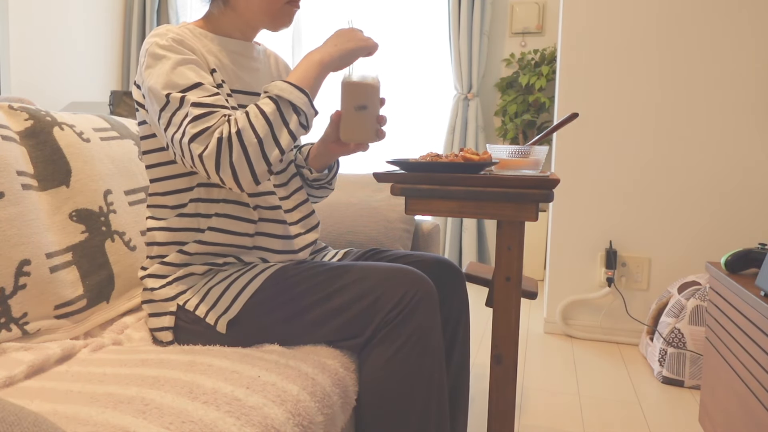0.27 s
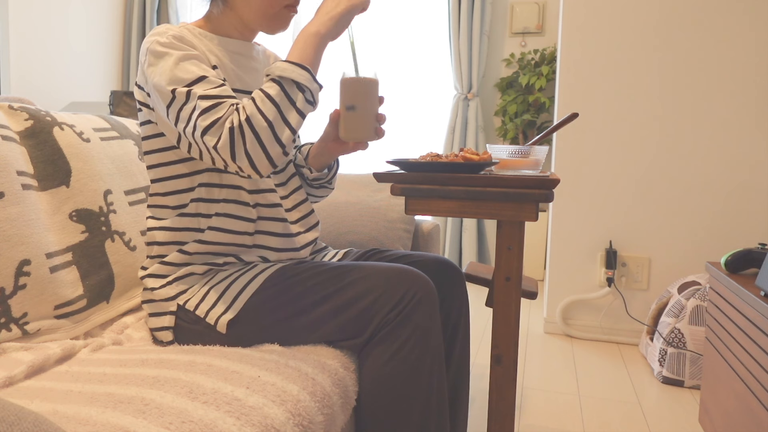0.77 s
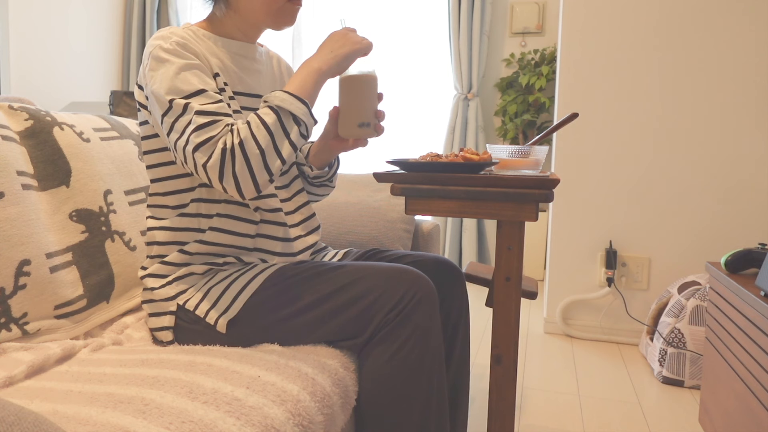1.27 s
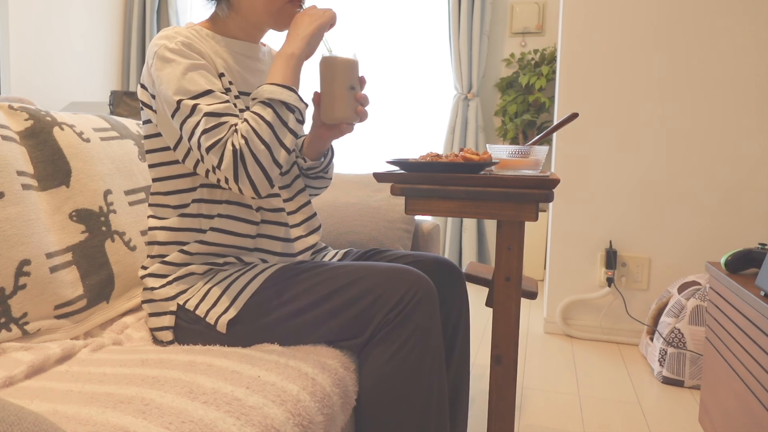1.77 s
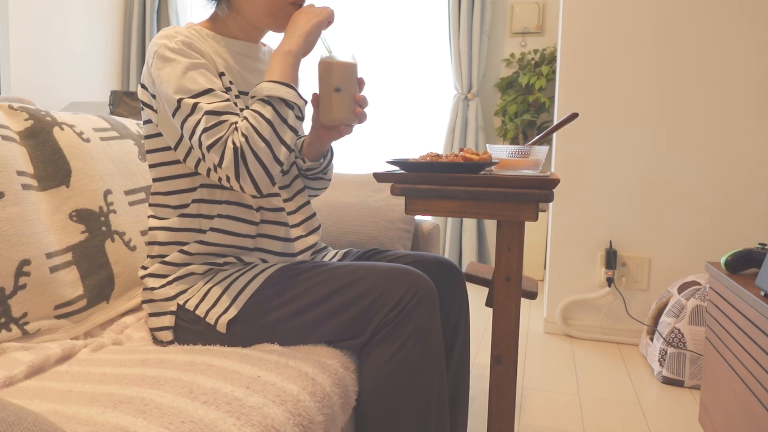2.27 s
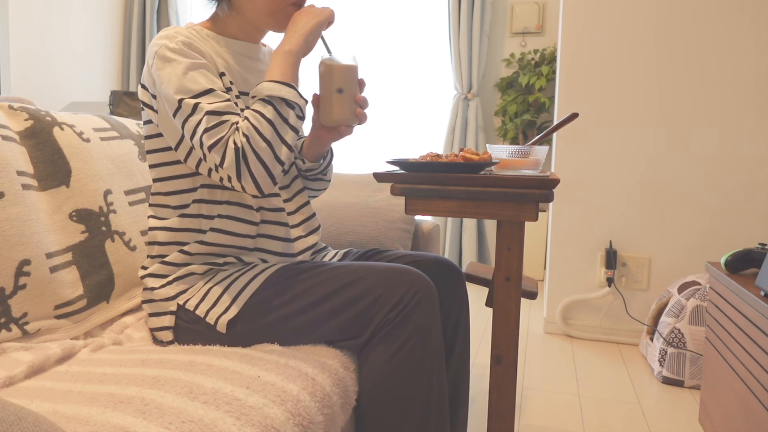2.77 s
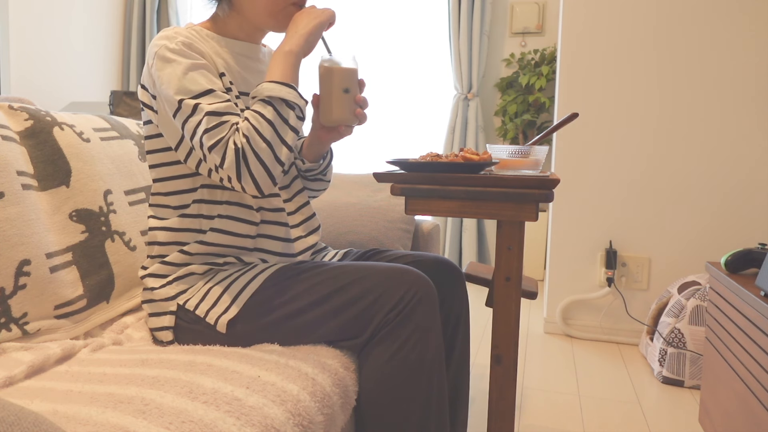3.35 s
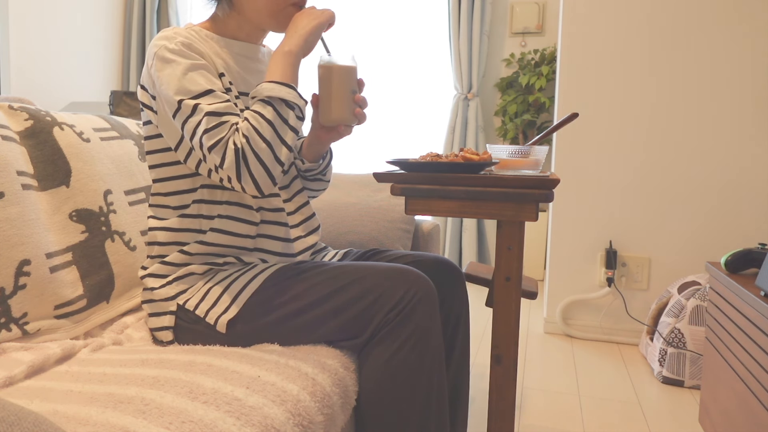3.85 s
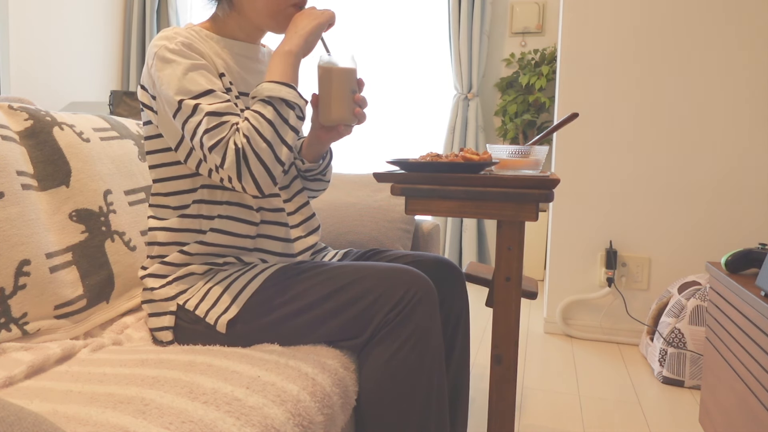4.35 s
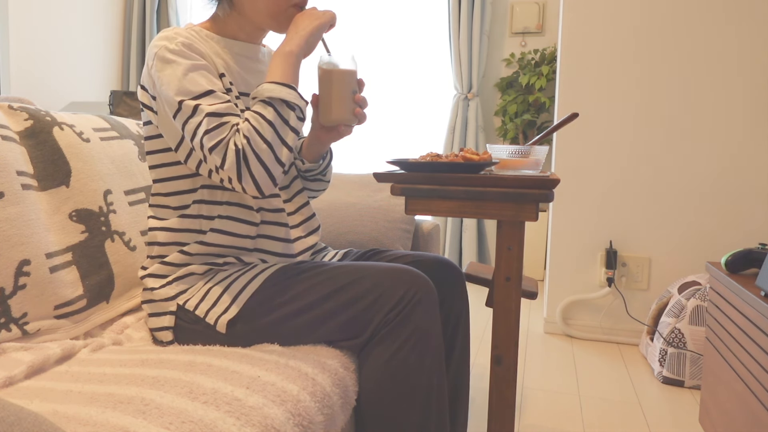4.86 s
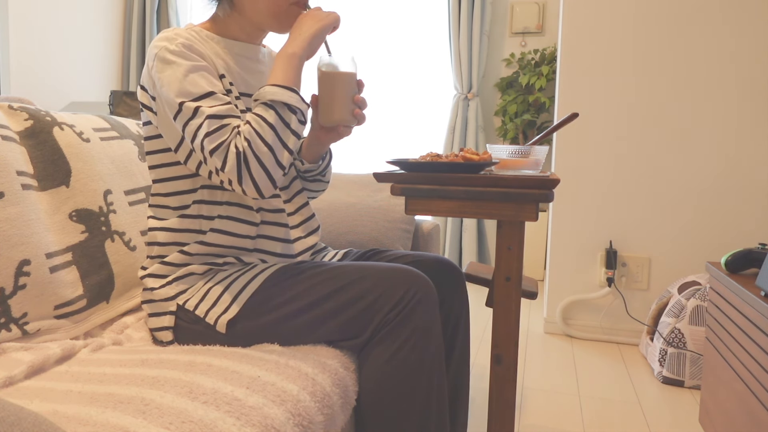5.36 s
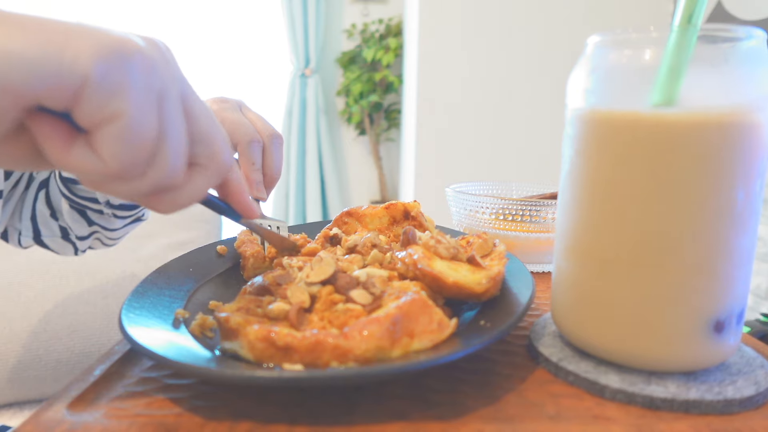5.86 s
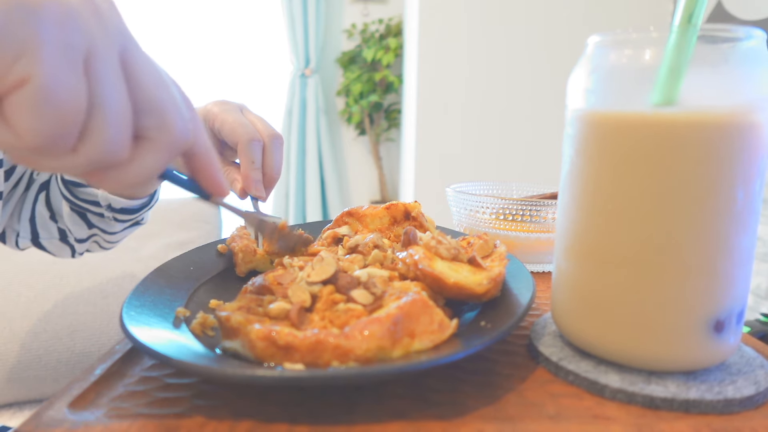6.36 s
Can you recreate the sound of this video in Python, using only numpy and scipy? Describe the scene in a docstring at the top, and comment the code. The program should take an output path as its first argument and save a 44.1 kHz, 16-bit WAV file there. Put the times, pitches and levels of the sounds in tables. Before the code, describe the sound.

In a small quiet living room, ice is stirred in a jar of milky drink, giving short damped clinks and rattles for under two seconds, the loudest around one and a half. A few faint settling ticks follow over soft hush and distant traffic. After two soft knocks at five seconds, a knife cuts crusty food close to the microphones, crunching and ticking hard on a ceramic plate.

```python
"""Iced coffee and a knife on a plate

A spoon stirs ice in a jar of milky coffee and the cubes settle: decaying tones over a blurred rattle.
Then a knife saws through crusty food and ticks on a ceramic plate: noise grains and bursts ring the plate.
A small quiet living room adds fading noise echoes; shaped noise makes its hush and the far traffic.
All of it reaches two close microphone openings, left and right."""
import sys
import numpy as np
from scipy import signal
from scipy.fft import rfft, irfft, next_fast_len
from scipy.io import wavfile
from scipy.ndimage import uniform_filter1d, map_coordinates

SR = 44100
rng = np.random.default_rng(int(sys.argv[2]) if len(sys.argv) > 2 else 0)


def digitize_waveform(pressure):
    """Quantize a signal to 16-bit integers and store it at the path in sys.argv[1].

    Rows of a 2-D input are taken as channels; values are limited to [-1, 1].
    """
    field = np.atleast_2d(pressure).T
    bounded = np.clip(field, -1, 1)
    quanta = np.round(bounded * 32767).astype(np.int16)
    wavfile.write(sys.argv[1], SR, quanta)


N = 291942
LEAD = SR // 10  # samples of room for sounds begun just before zero

# Background level over time. Each row: time in seconds, hush in dB, traffic drone in dB.
AMBIENCE = [(0, -69.5, -78.5), (1.901, -67, -75), (2.5, -70.5, -69.5), (3.6, -68.5, -73), (3.899, -68, -81),
            (5.3, -69, -88.5), (6.62, -65.5, -77)]
# Colour of the hush. Each row: pitch in Hz, relative level in dB per Hz.
HUSH_COLOUR = [(25, -39), (60, -23), (100, -16), (160, -19), (230, -8), (650, -7), (1250, -3), (1600, -6.5),
               (3250, -9.5), (7500, -19.5), (16000, -23.5)]
# Colour of the traffic drone. Each row: pitch in Hz, relative level in dB per Hz.
DRONE_COLOUR = [(550, -32.5), (720, -1), (900, 1.5), (1200, -7), (1600, -10), (2200, -34.5)]
# How alike left and right are in the background. Each row: pitch in Hz, likeness (1 is identical).
LEFT_RIGHT_LIKENESS = [(40, 0.96), (100, 0.9), (200, 0.794), (550, .72), (1650, .5), (5000, 0.32),
                       (15000, 1)]
# How long room echoes last. Each row: pitch in Hz, time to fade by 60 dB in seconds.
ECHO_FADE = [(500, 0.35), (1500, .33), (3500, 0.29), (9000, .3), (15000, 0.22)]
# How wide the echoes are. Each row: pitch in Hz, side level over middle level in dB.
ECHO_WIDTH = [(500, -10.5), (1200, -14.5), (3000, -13), (8000, -9.5), (12000, -26.5)]

# Small knocks without a ring. Each row: start in seconds, peak in dB, centre in Hz.
KNOCKS = [(3.269, -59.5, 3500), (4.743, -57.5, 15300), (5.001, -49.5, 916), (5.088, -45.5, 1552)]
KNOCK_WIDTH = 0.52  # width of the resonance over its centre

# Knife strokes through the crust. Each row: touch in seconds, full pressure from in seconds,
# held for in seconds, level in dB against a shared reference.
STROKES = [(5.509, 5.529, 0.037, -54), (5.633, 5.656, 0.013, -56), (5.698, 5.725, .03, -68),
           (5.832, 5.899, 0.02, -32.5), (6.04, 6.158, 0.071, -31.5), (6.253, 6.309, 0.0078, -34)]
LEAN_IN_DB_PER_S, LET_GO_DB_PER_S = 293, 460
# Blade ticks on the plate. Each row: start in seconds, peak in dB before the bass cut,
# level of the rim in dB before a shared lift.
TICKS = [(5.542, -43.5, -29.5), (5.663, -32.5, -34.5), (5.8575, -50, -30), (5.8795, -10.5, -25),
         (5.8929, -18, -26), (5.8995, -24.5, -19), (5.9249, -25, -13.5), (5.9464, -24.5, -28),
         (6.0707, -36, -25), (6.1025, -31.5, -41), (6.1236, -33, -39), (6.146, -30.5, -35),
         (6.1519, -24.5, -34), (6.2037, -14.5, -24), (6.2203, -17, -25), (6.2756, -23, -33),
         (6.3101, -9, -36), (6.3174, -29, -51), (6.381, -41, 8), (6.5974, -56, 1)]
# Plate body resonances. Each row: pitch in Hz, width in Hz, level in dB (width before doubling up).
PLATE_BODY = [(1814, 425, -3.5), (2140, 302, 8.5), (3387, 620, 4), (4500, 580, -6.5)]
# Higher plate rim resonances. Each row: pitch in Hz, width in Hz, level in dB.
PLATE_RIM = [(5774, 590, 6), (7420, 1600, -7), (9660, 1400, -14), (12700, 2100, -19)]
# Wooden top under the plate. Each row: pitch in Hz, width in Hz, level in dB.
TABLE_TOP = [(713, 156, 0.0046), (1350, 510, 0.011)]
DETUNE = .045  # share by which the plate's pitches shift with the spot pressed

# Ice and spoon contacts. Each row: start in seconds, peak in dB before the bass cut, favoured low ring in Hz,
# favoured higher ring in Hz, brightness in dB, ring over rattle in dB.
CLINKS = [(-.03, -24.5, 2300, 4530, -17, -26), (0.053, -38.5, 1840, 4770, -13.5, 0),
          (0.0961, -22, 2397, 5400, -6.5, 6), (0.202, -32, 3000, 4530, -3, -16),
          (0.2301, -31, 3520, 5130, -1, -26), (0.389, -24, 3600, 6150, -5.5, -34),
          (0.5169, -20, 3060, 12900, 5, -11), (0.5747, -33, 3060, 4530, -8.5, -16.5),
          (0.6905, -30.5, 3014, 4530, -14.5, -7), (0.8273, -28, 2780, 6150, -4.5, -20.5),
          (0.8367, -23.5, 2520, 5700, -6, -8), (0.8465, -20, 3270, 5400, -11.5, -7.5),
          (0.9223, -35, 2980, 5130, -7, -4), (0.9841, -35, 2780, 4770, -14, -4.5),
          (1.0092, -27.5, 3730, 5130, -8, -1), (1.0194, -24.5, 2780, 5130, -10, -12),
          (1.043, -27.5, 3610, 4530, -15.5, -23.5), (1.0834, -37.5, 2780, 4530, -5.5, -8),
          (1.1223, -4.5, 2780, 4530, -6.5, -2), (1.2216, -23.5, 3600, 4900, -9, -8),
          (1.264, -34, 1840, 5700, -11, 0.5), (1.4417, -28, 3300, 5700, -4.5, -19),
          (1.488, -23.5, 3240, 6150, 3, -5), (1.5587, -9, 3260, 5130, 12, -5.5),
          (1.6722, -14, 3140, 6630, 0, -6), (2.021, -41.5, 3610, 4530, -5, -7.5),
          (2.0813, -44, 3250, 5700, -7, -14), (2.3965, -51, 3597, 5130, -10, -13),
          (3.4463, -47.5, 3267, 5700, -12.5, -10), (3.482, -51.5, 3250, 5700, -1, 4),
          (3.6616, -35, 3300, 4760, -1, -7), (3.791, -36.5, 3170, 4760, -6.5, -8),
          (3.8923, -48, 3300, 4770, -7, -5)]
# What ice and jar ring with together. Each row: pitch in Hz, level in dB, time to fade by 60 dB in seconds.
RINGS = [(1810, -5.5, 0.031), (2520, -1, .035), (2780, 1.5, .025), (3140, 2.5, 0.04), (3300, 2.5, 0.035),
         (3380, 1, 0.03), (4530, -1, 0.094), (4760, 3.5, 0.037), (5055, 7.5, 0.033), (5646, 6, 0.039),
         (6210, 2, 0.027), (7570, 11.5, 0.035), (8300, 10.5, 0.03), (9980, 8.5, 0.029), (12900, 7, .025)]
# Jar wall, so damped by drink and hand that its modes blur. Each row: pitch in Hz, relative level in dB.
JAR_WALL = [(900, -48.5), (1600, -13), (2400, -4.5), (3300, -1), (4050, -0.5), (5300, 3), (8200, 11.5),
            (10500, 4.5), (16000, -2)]
# Bumps that set the air above the drink humming. Each row: start in seconds, peak in dB.
BUMPS = [(0.054, -53), (0.157, -58.5), (0.576, -53.5), (0.835, -51), (0.881, -60), (1.023, -51),
         (1.17, -51), (1.223, -60.5), (1.266, -52)]
AIR_HZ, AIR_T60 = 850, .035  # middle pitch of the hum, and seconds to fade by 60 dB
TREBLE_UNDER_DB = 10  # the treble lies this far under a contact's brightness
# a ring, or a wall mode, loses this many dB per percent away from a favoured pitch, up to a limit in dB
OFF_SPOT_DB, OFF_SPOT_MOST_DB = 1.5, 15
WALL_OFF_SPOT_DB, WALL_OFF_SPOT_MOST_DB = 1, 6

TOP_HZ = 16000  # upper limit of the sound


def amp(db):
    """Turns a level in dB into a gain."""
    return 10 ** (np.asarray(db) / 20)


def unit(x):
    """Scales x to an average strength (rms) of 1."""
    return x / np.sqrt(np.mean(x ** 2) + 1e-20)


def along(points, hz):
    """Reads values between (Hz, value) points, on a log pitch axis."""
    f, v = np.transpose(points)
    return np.interp(np.log(hz + 1), np.log(f + 1), v)


def filtered(x, response):
    """Shapes x by a gain, possibly complex, for each frequency."""
    m = next_fast_len(x.shape[-1] + 4096)
    spectrum = rfft(x, m) * response(np.fft.rfftfreq(m, 1 / SR))
    return irfft(spectrum, m)[..., :x.shape[-1]]


def resonances(modes):
    """Sum of (Hz, width, dB) resonances with alternating sign, each applied twice for steep skirts."""
    def response(f):
        total = 0
        for k, (centre, width, db) in enumerate(modes):
            peak = 1j * f * width / (centre * centre - f * f + 1j * f * width)
            total = total + (-1) ** k * amp(db) * peak ** 2
        return total
    return response


def add(track, s, sound, peak_db):
    """Mixes a sound in at a time and peak level."""
    at = LEAD + round(s * SR)
    track[at:at + len(sound)] += amp(peak_db) * sound[:len(track) - at] / np.abs(sound).max()


def rush(colour, patchy_db):
    """Stereo noise of rms 1 whose level varies in random patches of time and pitch."""
    z = signal.stft(rng.standard_normal((2, N)), nperseg=512)[2]
    patches = uniform_filter1d(rng.standard_normal(z.shape[1:]), size=4, axis=0)
    patches = uniform_filter1d(patches, size=14, axis=1)
    pair = signal.istft(z * amp(patchy_db * unit(patches)), nperseg=512)[1][:, :N]

    def mid_and_side(hz):
        turn = np.arccos(np.clip(along(LEFT_RIGHT_LIKENESS, hz), -1, 1)) / 2
        return amp(along(colour, hz)) * [np.cos(turn), np.sin(turn)]
    mid, side = filtered(pair, mid_and_side)
    return unit(np.array([mid + side, mid - side]))


def background():
    """Room hush and microphone hiss, with a swelling street drone, all made of coloured noise."""
    s, hush_db, drone_db = np.transpose(AMBIENCE)
    level = lambda db: amp(np.interp(np.arange(N) / SR, s, db))
    street = level(drone_db) * rush(DRONE_COLOUR, patchy_db=1.2) * amp([[-.7], [.7]])  # right is louder
    hush = level(hush_db) * rush(HUSH_COLOUR, patchy_db=1.2) * amp([[-.4], [.4]])
    return hush + street


def room(x):
    """Echoes as fading noise, mostly alike left and right; a new random pattern for each short piece of sound."""
    step = SR // 16
    out = np.zeros((2, len(x) + SR))
    fade = np.hanning(2 * step + 1)[:-1]  # overlapping pieces cross-fade
    for at in range(0, len(x), step):
        part = x[at:at + 2 * step]
        if np.abs(part).max() < 1e-5:
            continue
        hz, t, z = signal.stft(rng.standard_normal((2, SR // 3)), SR, nperseg=256)
        decay = amp(-60 * t / along(ECHO_FADE, hz)[:, None])
        width = np.array([hz ** 0, amp(along(ECHO_WIDTH, hz))])[..., None]
        mid, side = signal.istft(z * decay * width, SR, nperseg=256)[1]
        tail = np.array([mid + side, mid - side]) / np.linalg.norm(mid)
        wet = signal.fftconvolve((part * fade[:len(part)])[None], tail, axes=1)
        out[:, at + 200:at + 200 + wet.shape[1]] += wet  # the first walls answer after a few ms
    return out[:, :len(x)]


def knocks():
    """Soft blows without a ring: a puff of noise in one wide resonance."""
    track, t = np.zeros(LEAD + N), np.arange(SR // 20) / SR
    for s, db, hz in KNOCKS:
        puff = amp(-60 * t / 0.018) * (1 - np.exp(-t / 0.0013)) * rng.standard_normal(len(t))
        add(track, s, filtered(puff, resonances([(hz, KNOCK_WIDTH * hz, 0)])), db)
    return track


def pressure(t):
    """From the touch on, each stroke leans in, holds and lets go at steady rates in dB."""
    total = 0
    for touch, s, held, db in STROKES:
        lean_in = LEAN_IN_DB_PER_S * np.clip(s - t, 0, 1)
        let_go = LET_GO_DB_PER_S * np.clip(t - s - held, 0, 1)
        total = total + (t > touch) * amp(db - lean_in - let_go)
    return total


def knife():
    """Crumbs crush under the blade as uneven clumps of grains; bigger slips tick. All ring the plate."""
    t = (np.arange(LEAD + N) - LEAD) / SR
    samples = np.arange(len(t))
    press = pressure(t)
    clumps = amp(2.5 * map_coordinates(rng.standard_normal(len(t) // 120 + 4), [samples / 120]))
    grains = (rng.random(len(t)) < 4000 / SR) * rng.laplace(size=len(t)) * clumps  # about 4000 a second
    rim, table = resonances(PLATE_RIM), resonances(TABLE_TOP)

    def body(f, tune):
        return resonances([(hz * tune, width, db) for hz, width, db in PLATE_BODY])(f)

    def colour(tune):
        return lambda f: body(f, tune) + amp(-13.5) * rim(f) + amp(-14.0) * table(f)

    # where the blade bites: one of four spots, drifting to a new random place every 9 ms
    place = map_coordinates(rng.random(len(t) // 400 + 4), [samples / 400], order=1)
    spot = (place * 4).astype(int)
    track = np.zeros(len(t))
    for k in range(4):
        track += filtered(press * grains * (spot == k), colour(1 + DETUNE * (k - 1.5)))
    track = track / np.std(filtered(grains, colour(0.56)))  # shared reference level, plate tuned low

    short = np.arange(SR // 20) / SR
    for s, db, rim_db in TICKS:
        envelope = amp(-60 * short / 0.0092) * (1 - np.exp(-short / 0.00016))
        slip = envelope * rng.standard_normal(len(short))
        tune = rng.normal(1, DETUNE)

        def tick_colour(f):
            soft = 1 / (1 + 1j * f / 3000)  # the contact lasts a fraction of a millisecond
            low = body(f, tune) + amp(-17.5) * table(f)
            return soft * low + amp(rim_db + 5.5) * rim(f)
        add(track, s, filtered(slip, tick_colour), db)
    return filtered(track, lambda f: (1j * f / (1j * f + 350)) ** 2)  # the plate radiates little bass


def ice():
    """Contacts ring ice and jar, loudest near two favoured pitches, and rattle the wall; bumps hum the air."""
    track, t = np.zeros(LEAD + N), np.arange(SR // 10) / SR

    def ring(hz, db, t60, phase=0):
        return amp(db - 60 * t / t60) * np.sin(2 * np.pi * (hz * t + phase))

    ring_hz, ring_db, ring_t60 = np.transpose(RINGS)[..., None]
    for s, db, low_hz, high_hz, bright_db, clear_db in CLINKS:
        def percent_off(f):
            return 100 * np.abs(np.log(f / [low_hz, high_hz])).min(axis=1, keepdims=True)

        treble_db = bright_db - TREBLE_UNDER_DB
        tilt = [(3800, 0), (4400, bright_db), (6300, bright_db), (7400, treble_db)]  # how hard the blow is

        # rattle of the wall: 180 short-lived modes
        hz = np.geomspace(1000, 16000, num=180)[:, None] * rng.normal(1, .01, size=(180, 1))
        spot_db = np.minimum(WALL_OFF_SPOT_DB * percent_off(hz), WALL_OFF_SPOT_MOST_DB)
        level = along(JAR_WALL, hz) + along(tilt, hz) - spot_db + rng.normal(0, 1.5, size=hz.shape)
        wall_t60 = 0.022 * (3000 / hz) ** 0.089
        wall = ring(hz, level - 11, wall_t60, rng.random(hz.shape)).sum(axis=0)
        # the cube chatters before it settles
        bounces = (rng.random(len(t)) < 150 / SR) * amp(-16 - 60 * t / .15)
        wall = wall + signal.fftconvolve(wall, bounces)[:len(t)]

        # clear rings; an uneven cube rings in close clusters
        spot_db = np.minimum(OFF_SPOT_DB * percent_off(ring_hz), OFF_SPOT_MOST_DB)
        level = ring_db + clear_db + along(tilt, ring_hz) - spot_db
        level = level + rng.normal(0, 2, size=level.shape)
        twin_hz = ring_hz * rng.normal(1, .012, size=(2, *level.shape))
        cube = ring(ring_hz, level, ring_t60) + ring(twin_hz, level - 4, ring_t60).sum(axis=0)

        onset = (1 - np.exp(-t / 0.0003)) ** 2
        add(track, s, (wall + cube.sum(axis=0)) * onset, db)
    track = filtered(track, lambda f: (1j * f / (1j * f + 1000)) ** 2.5)  # a small jar radiates little bass
    for s, db in BUMPS:
        hum = ring(AIR_HZ * rng.normal(1, .04, size=(2, 1)), 0, AIR_T60).sum(axis=0)
        add(track, s, hum * (1 - np.exp(-t / .003)), db)
    return track


def scene():
    """The jar is farther from the microphones than the plate, so it carries more room."""
    jar, plate = ice() + knocks(), knife()
    near = jar * amp([[-1.2], [1.2]]) + plate * amp([[-.7], [.7]])  # left and right gains in dB
    wet = room(jar + amp(-9.0) * plate) * amp([[-.9], [.9]])
    return (near + wet)[:, LEAD:] + background()


def record(dry):
    """Cuts the sound off steeply above its upper limit."""
    return filtered(dry, lambda hz: 1 / (1 + (hz / TOP_HZ) ** 120))


dry = scene()
out = record(dry)
digitize_waveform(out)
```